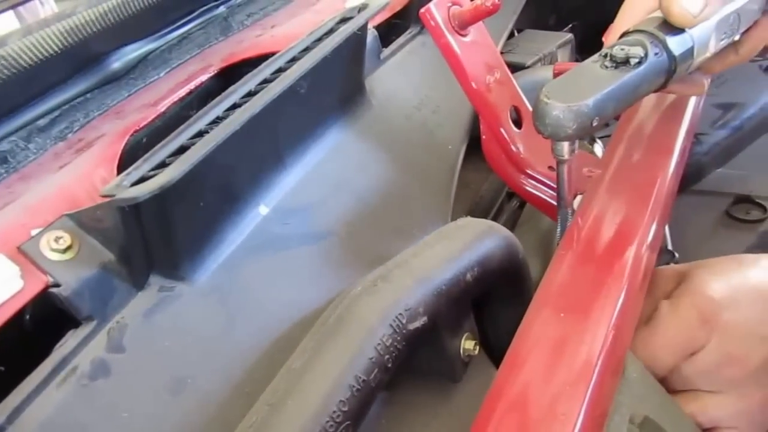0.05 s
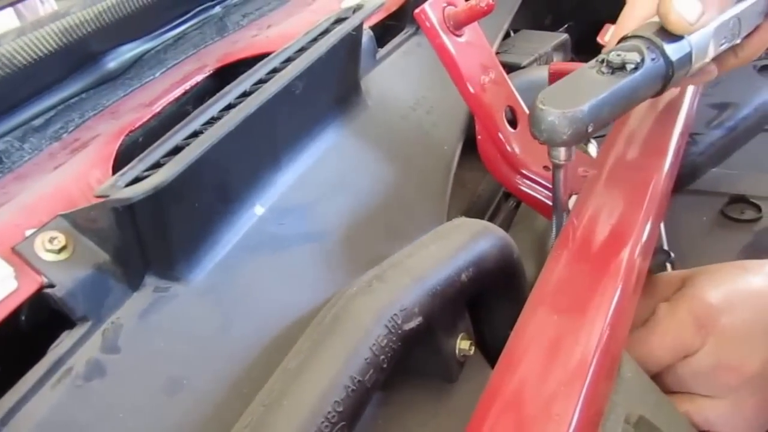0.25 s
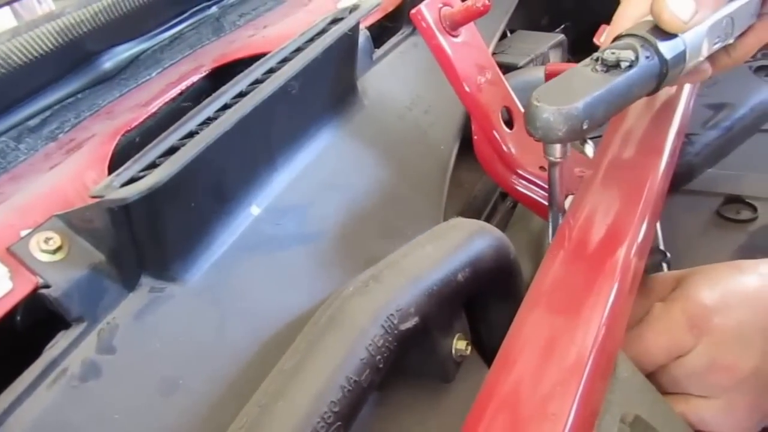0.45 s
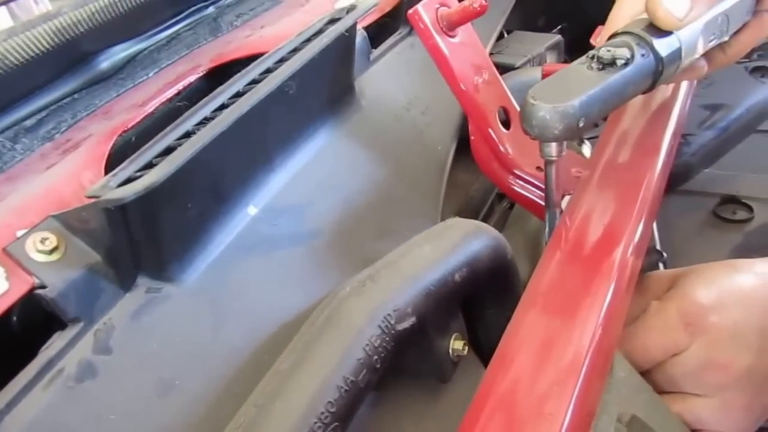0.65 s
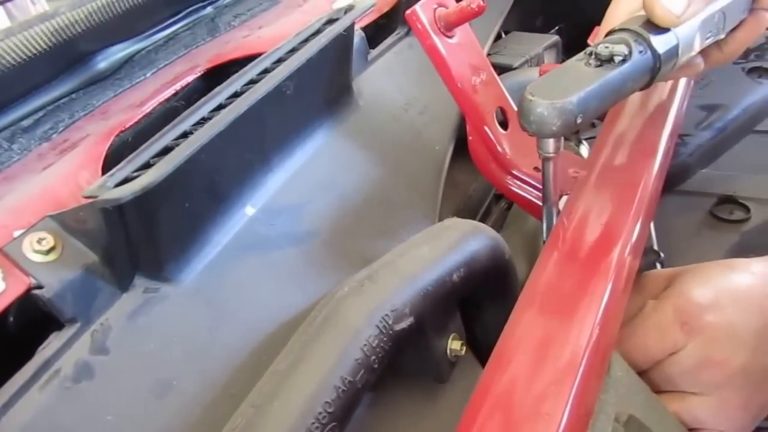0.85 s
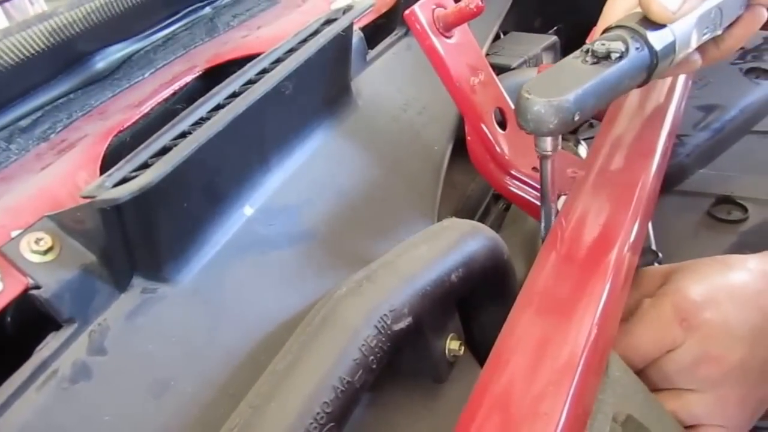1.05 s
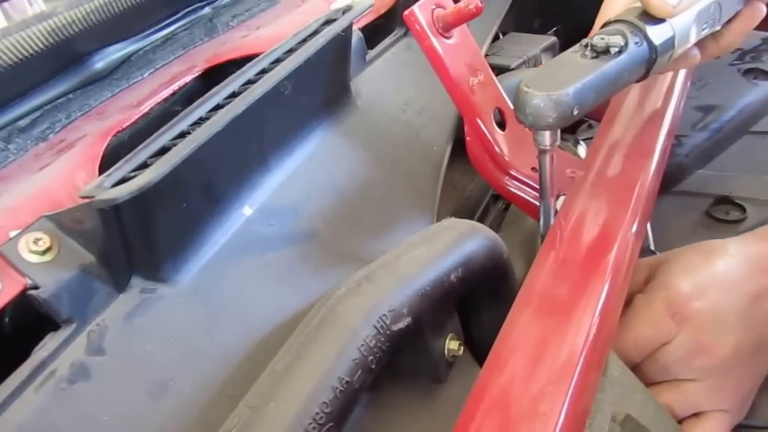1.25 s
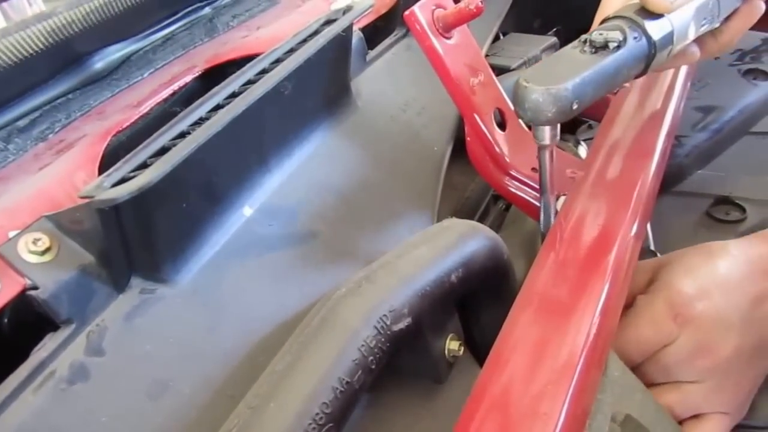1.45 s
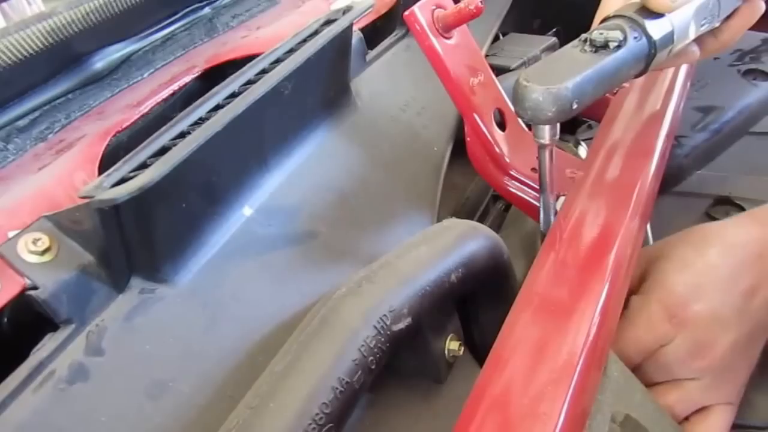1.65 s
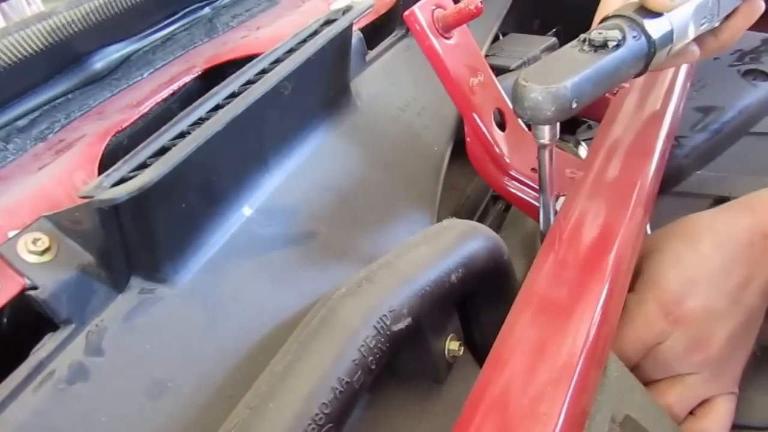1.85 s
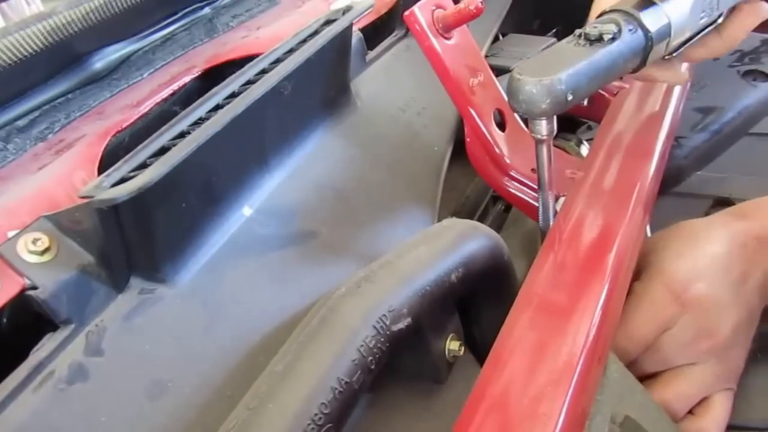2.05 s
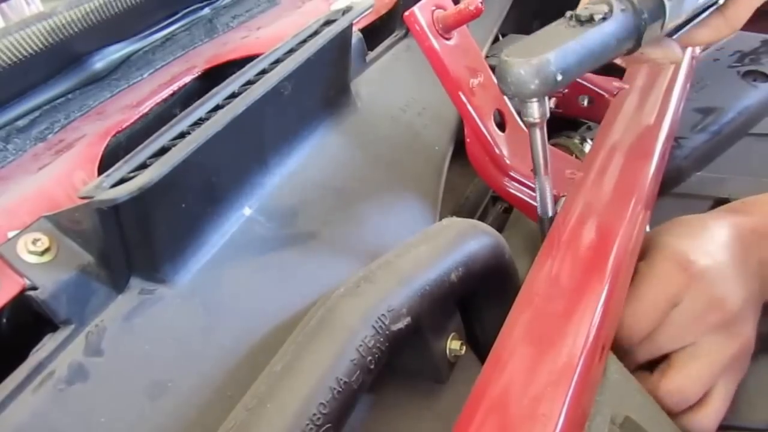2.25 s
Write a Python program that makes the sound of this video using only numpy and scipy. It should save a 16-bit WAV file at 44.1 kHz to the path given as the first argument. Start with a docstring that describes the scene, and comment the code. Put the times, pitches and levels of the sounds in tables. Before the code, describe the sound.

An air ratchet spins a bolt out of a car's engine bay, close by. After a few light knocks, it hisses loudly with a steady whine and fast rattle, then winds down with a short whoop and last clicks.

```python
"""Air ratchet in an engine bay

An air ratchet spins a bolt out of a car's engine bay, close by. Exhaust air hisses, the vane
motor whines and the pawl rattles the socket and the body panel. The trigger is let go,
the motor runs down with a short whoop and the pawl gives its last clicks."""
import sys
import numpy as np
from scipy import signal
from scipy.fft import rfft, irfft, next_fast_len
from scipy.io import wavfile
from scipy.ndimage import uniform_filter1d, map_coordinates

SR = 44100
rng = np.random.default_rng(int(sys.argv[2]) if len(sys.argv) > 2 else 0)


def transcribe(u):
    """Save the signal u as a 16-bit wav file named by the first command-line argument.

    u: samples, shape (n,) or (channels, n), limited to [-1, 1]; the rate is SR.
    q: integer samples, one column per channel.
    """
    v = np.clip(np.atleast_2d(u).T, -1, 1)
    q = np.round(v * 32767).astype(np.int16)
    wavfile.write(sys.argv[1], SR, q)


N = 101429
T = np.arange(N) / SR
OPEN_S, CLOSE_S = .2185, 1.988  # trigger pressed, let go
VANES_PER_STROKE = 17.5

# Workshop rumble. Each row: time in seconds, level in dB.
SHOP_LEVEL = [(0, -37), (.1, -37.5), (.2, -38.5), (2.05, -41), (2.14, -61), (2.3, -78)]
# Spectra of the rumble, the opening hiss and the lingering air. Each row: frequency in Hz, gain in dB.
SHOP_SPECTRUM = [(15, -41), (25, -28.5), (51, -15), (79, 0), (95, -3), (118, -2), (142, -12), (637, -19.5),
                 (709, -21.5), (769, -22.5), (1280, -16), (1720, -34.5), (15000, -52)]
EARLY_HISS_SPECTRUM = [(120, -20.5), (200, 5), (419, -21.5), (1020, -40), (1130, -13), (1570, -12.5),
                       (3730, -10), (15000, -24)]
LINGERING_SPECTRUM = [(25, -5), (100, -4), (300, -6), (560, -11.5), (750, 2), (900, -17), (1600, -8),
                      (2500, -24), (3500, -18), (7000, -16), (10000, -10), (11700, -17), (12500, -32),
                      (15000, -38)]
# Modes of the booming panel, of panel and steel socket as the drive lets go, of the rattled panel, and
# of the steel head and socket. Each row: frequency in Hz, gain in dB, 60 dB decay time in seconds.
BOOM_MODES = [(111.8, -35, 0.78), (76, -39, .25)]
RELEASE_MODES = [(62, -37, 0.42), (393, -30, 0.22), (475, -34, 0.16), (2180, -34, 0.25), (7350, -40, .18)]
PANEL_MODES = [(366, 5, 0.063), (458, 0.5, 0.12), (310, -9.5, 0.014)]
STEEL_MODES = [(1502, -10.5, .05), (2281, 4, 0.14), (3290, -0.5, 0.028), (4130, -12.5, 0.017),
               (4740, -3.5, 0.037), (5270, -6, 0.054), (5550, -5, 0.29), (5960, 5, 0.087),
               (6820, 1.5, 0.046), (7470, -1, 0.068), (8530, 4.5, 0.073), (8700, -9, .03)]
# Single pawl clicks. Each row: start in seconds, level in dB, 60 dB decay time in seconds.
PAWL_CLICKS = [(.069, -48, 0.05), (2.0237, -23.5, 0.11), (2.074, -26, 0.062), (2.079, -34, 0.094),
               (2.0955, -29.5, 0.065), (2.176, -48, .05)]
# Knocks on the bolt. Each row: start in seconds, level in dB, 60 dB decay time in seconds, thud in dB.
BOLT_KNOCKS = [(0.0303, -27.5, 0.045, -26.5), (0.036, -34, 0.09, -33), (0.048, -37, 0.051, -32),
               (2.044, -27, .06, -38), (2.096, -32, 0.12, -49), (2.1655, -36, 0.041, -50),
               (2.176, -47, 0.076, -59), (2.221, -53, .05, -73)]
# Spectra of the impacts, the rotor's siren and the gear teeth. Each row: frequency in Hz, gain in dB.
CLICK_SPECTRUM = [(300, -4.5), (1400, 3), (2500, 4), (3800, -7), (5500, 3), (7000, 1), (8700, 9.5),
                  (10500, -7.5), (15000, -10)]
KNOCK_SPECTRUM = [(100, -10), (500, -10), (1400, -3.5), (2300, -9.5), (3500, -10.5), (6000, -31),
                  (14000, -51.5)]
THUD_SPECTRUM = [(30, -2), (90, -6.5), (210, 1), (400, -5), (900, -18), (3000, -78)]
SIREN_SPECTRUM = [(300, -16), (600, 8.5), (800, 2.5), (1000, -3.5), (1400, -2), (1650, -8), (1950, -1.5),
                  (2300, -4), (2600, -15), (3200, -27), (8000, -37)]
RASP_SPECTRUM = [(500, -10), (700, -6.5), (1000, -8), (1500, -5), (2300, 1), (2900, -17.5), (3900, -5.5),
                 (5200, 1.5), (7000, 3.5), (8300, -1.5), (9800, 4.5), (11500, -2), (15700, -16.5)]
# Running speed of the motor. Each row: time in seconds, vane rate in Hz.
VANE_RATE = [(.3, 1641), (.42, 1622), (.52, 1617), (.65, 1623), (.8, 1642), (1.05, 1646), (1.12, 1637),
             (1.3, 1638), (1.47, 1648), (1.98, 1651)]
# Load on the pawl, falling as the bolt loosens. Each row: time in seconds, gain in dB.
PAWL_LOAD = [(.235, -68), (.285, -19.5), (.38, -25.5), (.53, -27.5), (.645, -24), (.73, -33), (.79, -26.5),
             (.9, -28.5), (1.12, -32), (1.4, -36.5), (1.52, -31.5), (1.7, -34), (1.85, -34), (1.98, -34.5)]
# Forced vibration of the panel. Each row: multiple of the stroke rate, gain in dB.
PANEL_HARMONICS = [(2, -8), (3, -15), (4, -1), (5, -8), (7, -16.5), (8, -12.5), (10, -16.5)]
# Harmonics of the whine, swelling as the tool moves. Each row: multiple of the vane rate,
# base level in dB, swell in dB, time and width of the swell in seconds.
WHINE_HARMONICS = [(1, -36.5, 13.5, 1.78, 1), (2, -39, 10, 0.5, 0.35), (2, -49, 14.5, 1.1, 0.19),
                   (3, -37.5, 12, 1.35, 0.2), (4, -39, 8.5, 2.2, .25), (5, -39.5, 8.5, 1.2, 0.45),
                   (6, -42, 11, .55, 0.22)]
# Exhaust air. Each row: time in seconds, level in dB.
EXHAUST_LEVEL = [(.22, -10.5), (.265, -11), (.29, -14), (.45, -13), (.62, -13.5), (.85, -14.5), (1.15, -14),
                 (1.35, -13.5), (1.65, -14.5), (1.98, -14.5)]
# Exhaust spectra with the bolt deep in and nearly out. Each row: frequency in Hz, gain in dB.
BOLT_IN_SPECTRUM = [(60, -29), (200, -16), (400, -4), (600, -7), (880, -9), (1150, -6.5), (1550, -1),
                    (1750, -4), (2300, -3.5), (2900, -8.5), (3800, -8), (4300, -1), (5600, -2), (6400, -3),
                    (7400, -2.5), (8800, -1), (9800, 1), (11300, -6.5), (13000, -11), (15700, -14.5)]
BOLT_OUT_SPECTRUM = [(60, -13), (200, -11), (400, -4.5), (600, -12), (880, -11.5), (1150, -9.5),
                     (1550, -5.5), (1750, -6.5), (2300, -7), (2900, -10), (3800, -8.5), (4300, -3.5),
                     (4900, -5.5), (6200, -8), (6700, -4), (7800, -4), (9800, -1), (11300, -7.5),
                     (13000, -13), (15700, -18)]
# Bands of hiss that change as the tool turns. Each row: centre and width in Hz, gain in dB,
# time and width in seconds.
HISS_BANDS = [(5500, 410, 7, 0.72, 0.05), (6900, 220, 4, 1.9, 0.26), (3260, 110, 2.5, 0.71, 0.6),
              (4700, 300, -0.5, 1.2, 0.09)]


def amp(db):
    """Amplitude ratio of a level in decibels."""
    return 10 ** (np.asarray(db) / 20)


def unit(x):
    """Normalisation to an rms of 1."""
    return x / np.sqrt(np.mean(x ** 2) + 1e-20)


def curve(rows):
    """Linear interpolation of (time, value) rows at every sample."""
    return np.interp(T, *np.transpose(rows))


def gain_at(spectrum, hz):
    """Amplitude response, interpolated in decibels over log frequency."""
    freqs, db = np.transpose(spectrum)
    return amp(np.interp(np.log(hz + 1), np.log(freqs + 1), db))


def wobble(rate):
    """Smooth random modulation: a spline through `rate` knots a second."""
    return map_coordinates(rng.standard_normal(int(N * rate / SR) + 4), [T * rate])


def filtered(x, response):
    """Zero-phase filtering: the spectrum is multiplied by a frequency response."""
    size = next_fast_len(N + SR // 2)
    return irfft(rfft(x, size) * response(np.fft.rfftfreq(size, 1 / SR)), size)[..., :N]


def noise(spectrum, low_hz=20):
    """Spectrally shaped noise of rms 1, rolled off below low_hz."""
    white = rng.standard_normal(N)
    return unit(filtered(white, lambda f: gain_at(spectrum, f) * f ** 2 / (f ** 2 + low_hz ** 2)))


def fade(start, t60, contact_s=.0004):
    """Envelope of a blow: quick rise, then exponential decay."""
    age = np.maximum(T - start, 0)
    return (1 - np.exp(-age / contact_s)) * np.exp(-np.log(1000) * age / t60)


def ring(modes, start=0):
    """Free vibration: each struck mode is a damped sinusoid."""
    return sum(amp(db) * fade(start, t60) * rng.choice([-1, 1]) * np.sin(2 * np.pi * hz * (T - start))
               for hz, db, t60 in modes)


def workshop(tone_hz=2220):
    """Ambient noise: rumble, a dying hiss, and faint air and a tone that linger after the run."""
    tone = amp(-63) * np.sqrt(2) * np.sin(2 * np.pi * tone_hz * T)
    lingering = (T > CLOSE_S) * (tone + amp(-60.5) * noise(LINGERING_SPECTRUM))
    rumble = amp(curve(SHOP_LEVEL)) * noise(SHOP_SPECTRUM)
    early_hiss = amp(-35.5) * noise(EARLY_HISS_SPECTRUM, low_hz=150) * fade(0, t60=.17)
    return rumble + early_hiss + lingering


def room(x):
    """Reverberation: diffuse reflections add a short decaying tail."""
    tail = rng.standard_normal(N) * fade(.0024, t60=.26)
    return x + amp(-22) * signal.fftconvolve(x, tail / np.linalg.norm(tail))[:N]


def bay_walls(x, count=24, spread_s=.014):
    """Early reflections: close panels of the engine bay return weak copies."""
    delays = (rng.random(count) * spread_s * SR).astype(int)
    strengths = rng.standard_normal(count)
    echoes = np.bincount(delays, strengths / np.linalg.norm(strengths))
    return x + amp(-15) * signal.fftconvolve(x, echoes)[:N]


def panel_and_socket():
    """Resonance: the panel booms after the first knocks; it and the socket ring as the drive lets go."""
    return ring(BOOM_MODES, start=.077) + ring(RELEASE_MODES, start=CLOSE_S)


def handling():
    """Transients: single pawl clicks, knocks on the bolt and the low puff of the opening valve."""
    crack = noise(CLICK_SPECTRUM, low_hz=200)
    knock = noise(KNOCK_SPECTRUM, low_hz=80)
    thud = noise(THUD_SPECTRUM)
    clicks = sum(amp(db) * (crack * fade(start, t60) + amp(-15) * ring(STEEL_MODES, start))
                 for start, db, t60 in PAWL_CLICKS)
    knocks = sum(amp(db) * knock * fade(start, t60) + amp(thud_db) * thud * fade(start, t60=.12)
                 for start, db, t60, thud_db in BOLT_KNOCKS)
    puff = amp(-23.5) * thud * fade(OPEN_S, t60=.27)
    return clicks + knocks + puff


def pressure(opening_s=.0049, vent_s=.014, bleed_s=.018):
    """Air pressure, 0 to 1. Once the valve shuts it decays exponentially: a fast vent, then a bleed."""
    opening = np.clip((T - OPEN_S) / opening_s, 0, 1) ** 2
    closed_for = np.maximum(T - CLOSE_S, 0)
    return opening * np.maximum(np.exp(-closed_for / vent_s), amp(-6.5) * np.exp(-closed_for / bleed_s))


def motor(spin_up_s=.02, run_down_s=.036):
    """The rotor gains and loses speed exponentially. Returns vane rate in Hz and vanes passed."""
    rise = 1 - np.exp(-np.maximum(T - OPEN_S, 0) / spin_up_s)
    fall = np.exp(-np.maximum(T - CLOSE_S, 0) / run_down_s)
    vane_hz = curve(VANE_RATE) * rise * fall * (1 + .0015 * wobble(90))
    return vane_hz, np.cumsum(vane_hz) / SR


def whoop(vane_hz, vanes, chirp_s=.244, chirp_width_s=.012, whoop_s=2.001, width_s=.0064, echo_s=.014):
    """Siren principle: the slow rotor pumps air, in a rising chirp and, coasting, a falling whoop."""
    late = T - whoop_s
    tail = amp(-18.5) * np.clip(late / width_s, 0, 1) * np.exp(-abs(late) / .013)
    coast = np.exp(-(late / width_s) ** 2 / 2) + tail
    chirp = pressure() * np.exp(-((T - chirp_s) / chirp_width_s) ** 2 / 2)
    tone = sum(gain_at(SIREN_SPECTRUM, k * vane_hz) * np.sin(2 * np.pi * k * vanes) for k in (1, 2))
    roughness = 1 + .35 * wobble(400)
    siren = (amp(-8.3) * coast + amp(-21) * chirp) * tone * roughness
    return siren + amp(-11) * np.interp(T - echo_s, T, siren)


def gears(vanes, points=4096):
    """Periodic excitation: the same rough teeth meet each turn, so the rasp repeats at the stroke rate."""
    profile = uniform_filter1d(rng.standard_normal(points), size=9, mode="wrap")
    turns = vanes / VANES_PER_STROKE
    contact = np.interp(turns, np.arange(points) / points, profile, period=1) * pressure()
    rasp = filtered(contact, lambda f: gain_at(RASP_SPECTRUM, f) * f / (f + 300))
    return amp(-24.5) * pressure() * unit(rasp)


def pawl(vanes, waver_db=.9, scatter_db=2, shake_rise_s=.063):
    """Forced vibration and impact: each stroke shakes the tool and the panel and rattles the socket."""
    drive = pressure()
    strokes = vanes / VANES_PER_STROKE + .014 * wobble(30) * drive

    def harmonic(k):
        return np.sqrt(2) * amp(waver_db * wobble(16)) * np.sin(2 * np.pi * (k * strokes + rng.random()))

    running = np.maximum(T - OPEN_S, 0)
    onset = 1 - np.exp(-(running / shake_rise_s) ** 2)
    shake = amp(-27.5 - 6 * running) * onset * harmonic(1)
    hum = sum(amp(db) * harmonic(k) for k, db in PANEL_HARMONICS)
    new_stroke = np.diff(np.floor(strokes), prepend=0) > 0
    blows = new_stroke * amp(scatter_db * np.clip(rng.standard_normal(N), -2, 2)) * drive
    panel = amp(-15.5) * unit(signal.fftconvolve(blows, ring(PANEL_MODES))[:N])
    socket = amp(-29) * unit(signal.fftconvolve(blows, ring(STEEL_MODES))[:N])
    return shake * drive + amp(curve(PAWL_LOAD)) * (hum * drive + panel) + socket


def whine(vanes):
    """Harmonic series of the vane rate: partials swell in turn, the second twice, and waver slightly."""
    tone = np.zeros(N)
    for k, base_db, swell_db, peak_s, width_s in WHINE_HARMONICS:
        db = base_db + swell_db * np.exp(-((T - peak_s) / width_s) ** 2) + wobble(25)
        tone += amp(db) * np.sin(2 * np.pi * (k * vanes + rng.random()))
    return pressure() * np.sqrt(2) * tone


def swelling(hiss):
    """Time-varying filter: bands of the hiss swell or dip, with random patches of about 1 dB."""
    freqs, times, spectrogram = signal.stft(hiss, SR, nperseg=512)
    swell_db = sum(db * np.exp(-((freqs[:, None] - hz) / width_hz) ** 2 - ((times - at) / width_s) ** 2)
                   for hz, width_hz, db, at, width_s in HISS_BANDS)
    patches = uniform_filter1d(rng.standard_normal(spectrogram.shape), size=6, axis=0)
    patch_db = unit(uniform_filter1d(patches, size=18, axis=1))
    return signal.istft(spectrogram * amp(swell_db + patch_db), nperseg=512)[1][:N]


def exhaust(vanes, vane_depth=.093, stroke_depth=.055):
    """Amplitude modulation: vanes and pawl strokes chop a hiss whose colour shifts as the tool rises."""
    risen = np.clip((T - .7) / .69, 0, 1)
    hiss = np.sqrt(1 - risen) * noise(BOLT_IN_SPECTRUM, low_hz=89)
    hiss += np.sqrt(risen) * noise(BOLT_OUT_SPECTRUM, low_hz=130)
    phase = 2 * np.pi * vanes
    chop = 1 + vane_depth * np.cos(phase) + stroke_depth * np.cos(phase / VANES_PER_STROKE)
    air = unit(bay_walls(swelling(hiss) * chop))
    return air * amp(curve(EXHAUST_LEVEL) - .1 * wobble(70)) * pressure()


def scene():
    """Superposition of all sources, the same in both channels."""
    vane_hz, vanes = motor()
    ringing = panel_and_socket()
    reverberant = room(exhaust(vanes) + bay_walls(whoop(vane_hz, vanes)) + handling())
    mono = reverberant + whine(vanes) + gears(vanes) + pawl(vanes) + ringing + workshop()
    return np.array([mono, mono])


def record(dry, ceiling=.95, top_hz=15900, edge_hz=130):
    """Soft saturation rounds the highest peaks, and a low-pass filter limits the band."""
    rounded = dry / (1 + abs(dry / ceiling) ** 4) ** (1 / 4)
    return filtered(rounded, lambda f: .5 - .5 * np.tanh((f - top_hz) / edge_hz))


dry = scene()
out = record(dry)
transcribe(out)
```